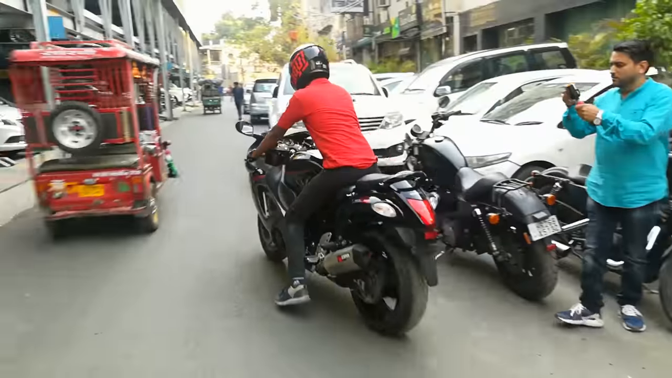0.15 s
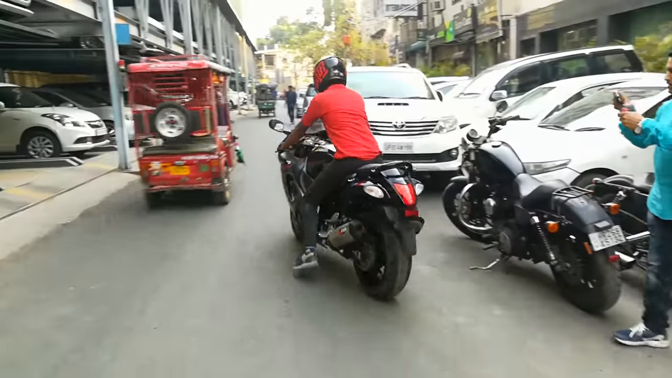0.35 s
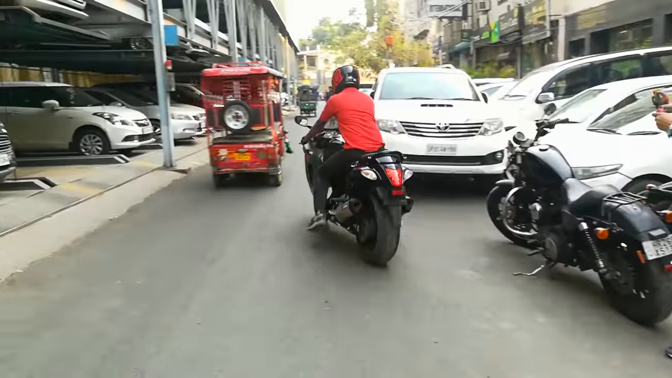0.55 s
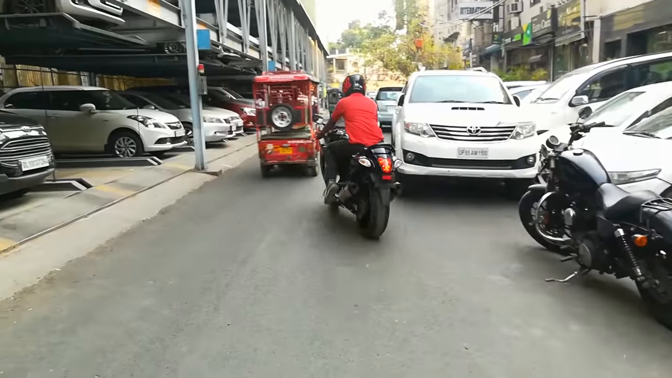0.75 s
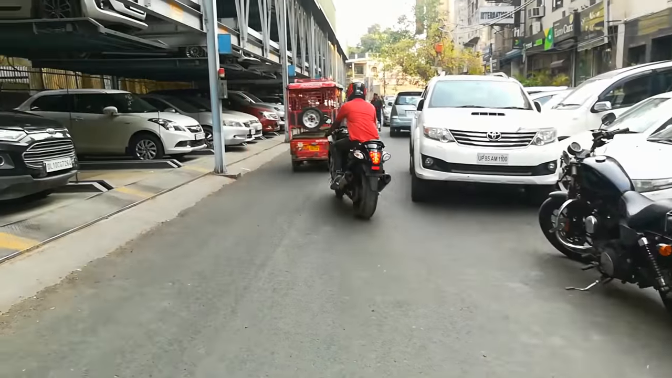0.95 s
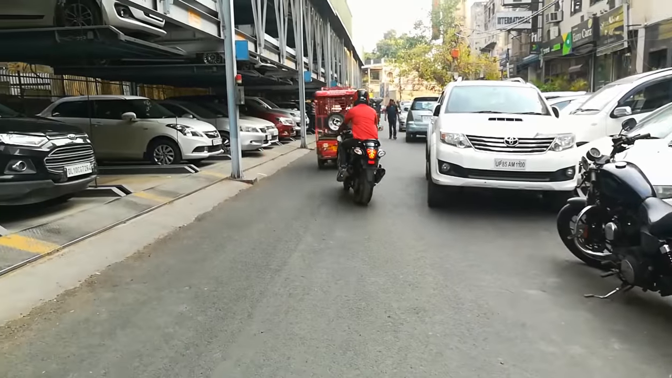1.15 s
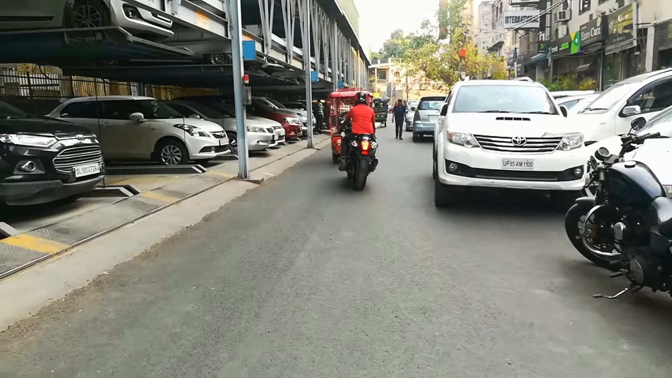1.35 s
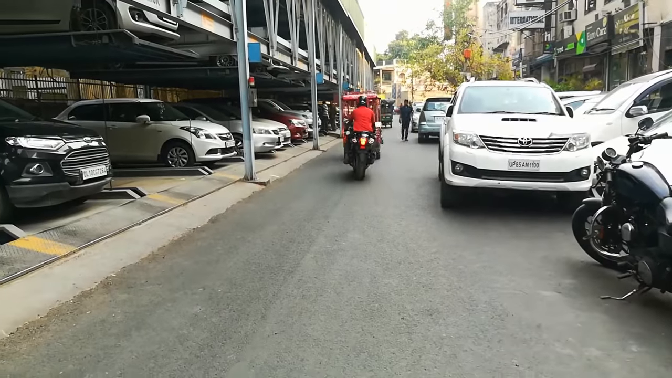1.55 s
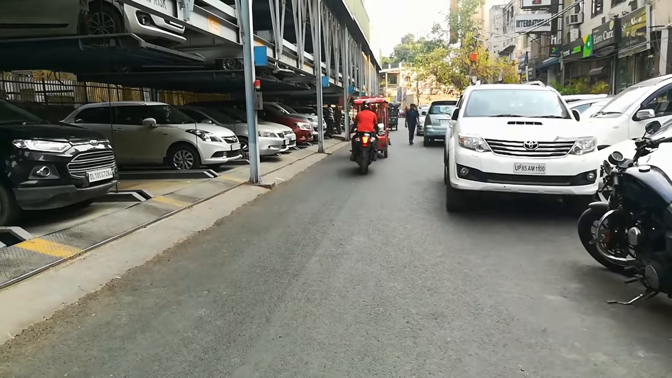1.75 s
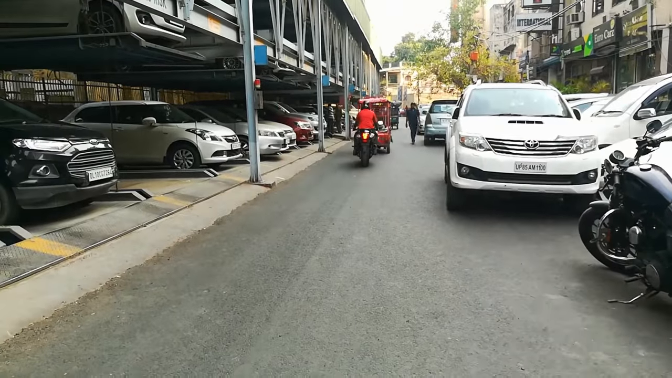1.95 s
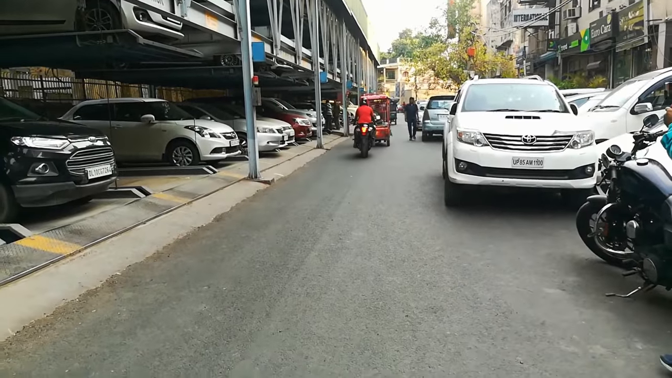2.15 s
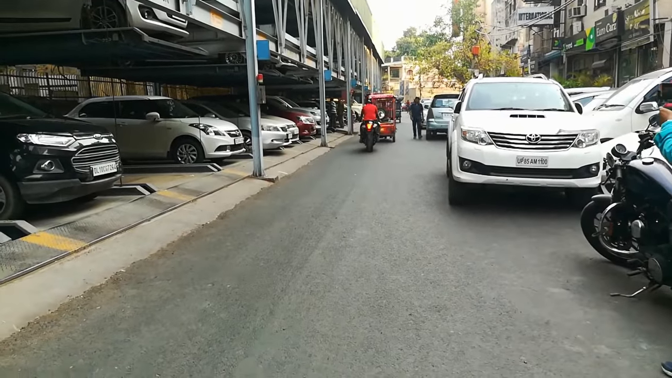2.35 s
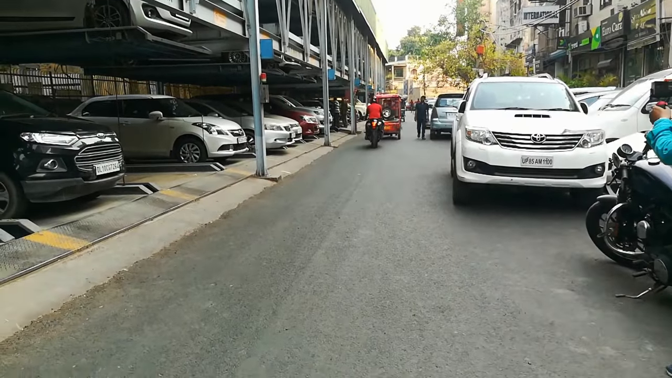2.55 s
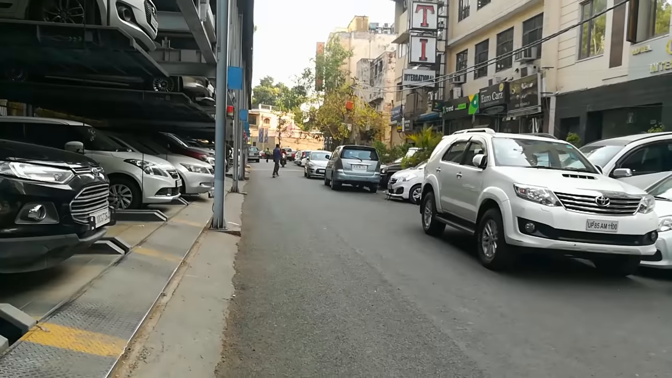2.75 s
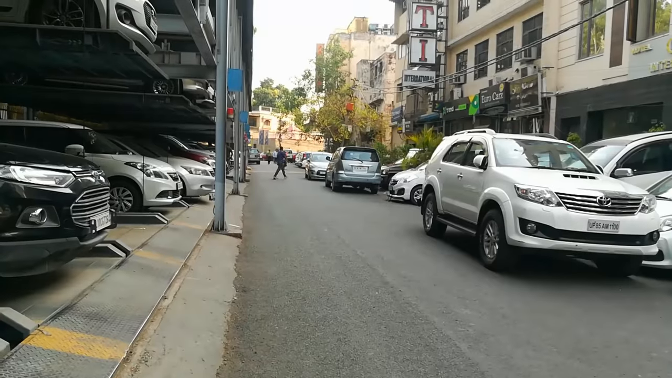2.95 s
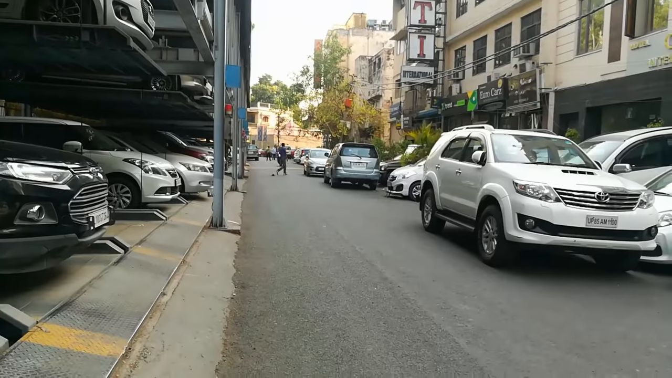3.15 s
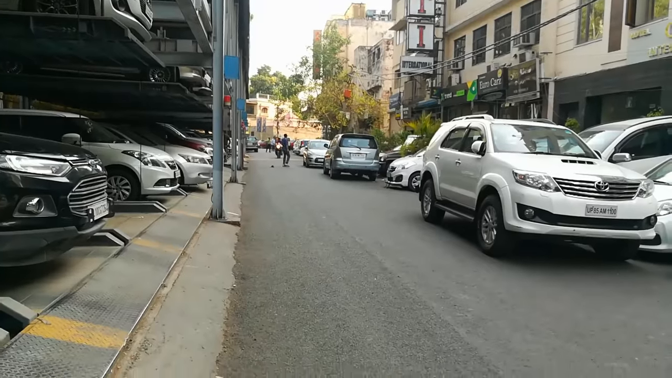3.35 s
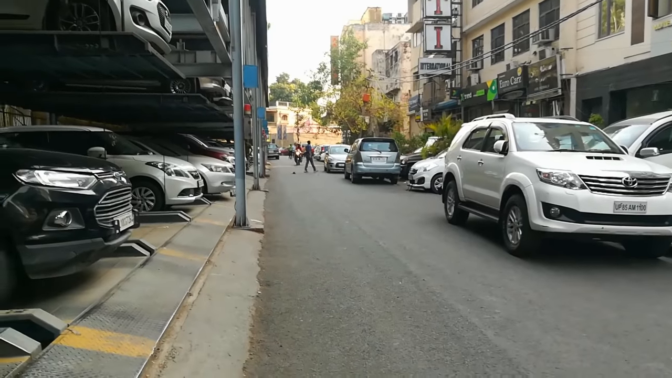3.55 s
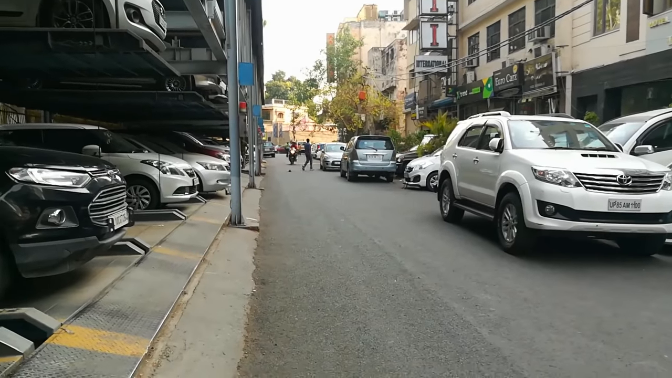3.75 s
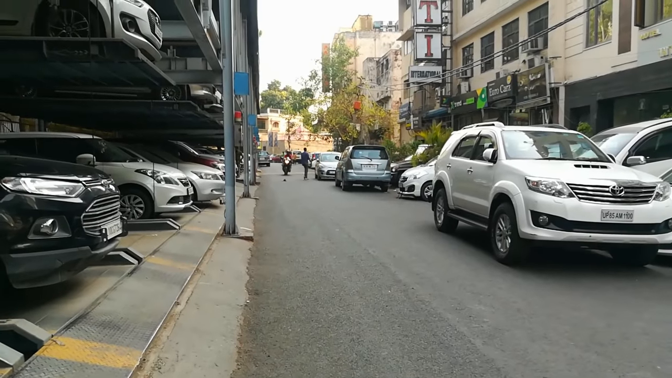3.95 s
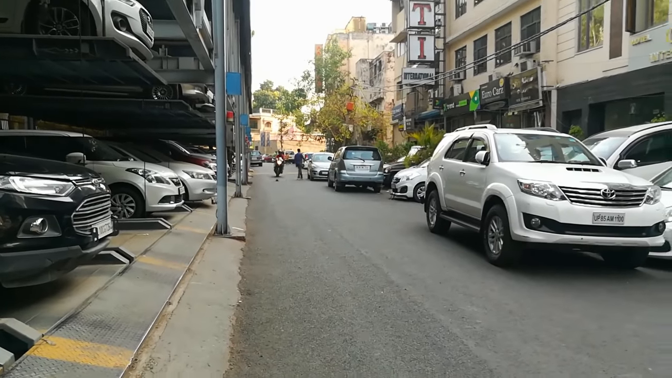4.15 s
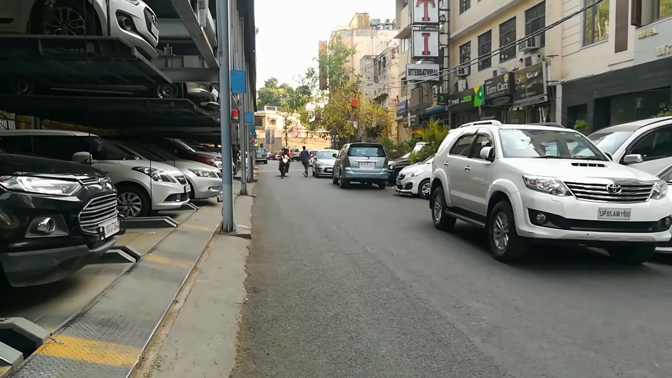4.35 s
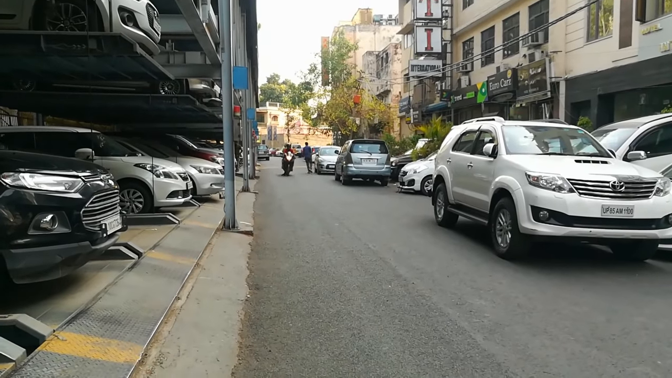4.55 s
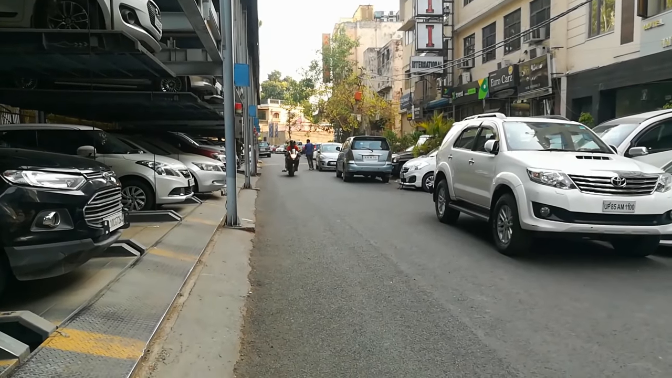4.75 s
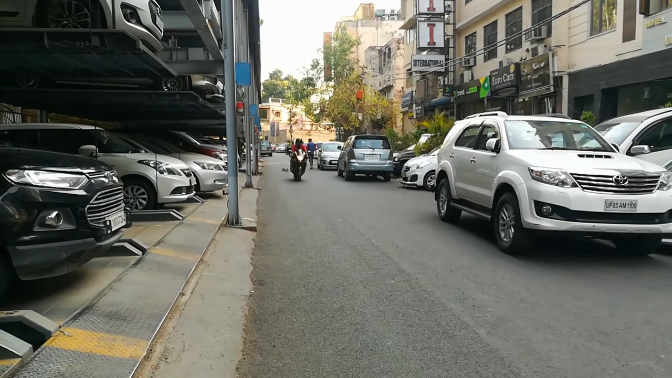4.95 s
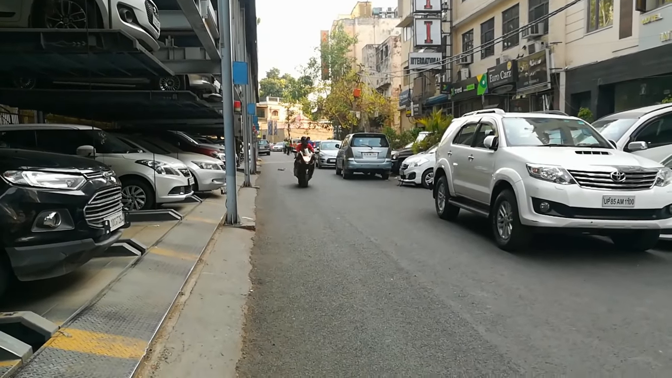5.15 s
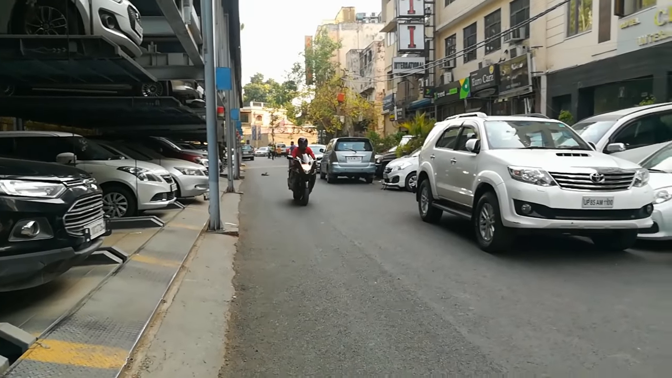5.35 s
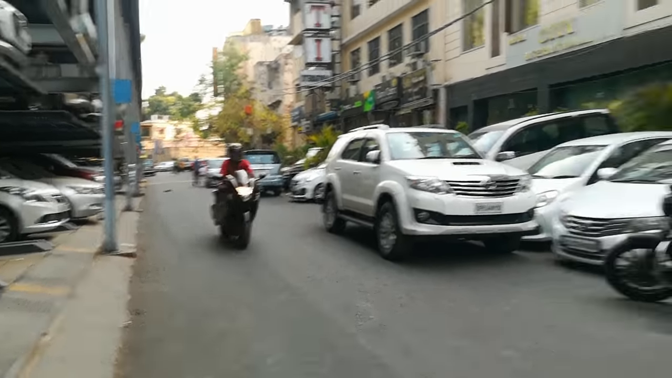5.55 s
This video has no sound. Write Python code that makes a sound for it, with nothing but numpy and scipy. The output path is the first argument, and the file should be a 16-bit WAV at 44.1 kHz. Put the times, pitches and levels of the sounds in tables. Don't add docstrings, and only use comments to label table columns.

```python
import sys
import numpy as np
from scipy import signal
from scipy.io import wavfile
from scipy.ndimage import uniform_filter1d

SR = 44100
rng = np.random.default_rng(int(sys.argv[2]) if len(sys.argv) > 2 else 0)


def nominal_scale(level):
    x = np.asarray(level, float) / 20
    return 10 ** x


def wav_out(sig):
    wavfile.write(sys.argv[1], SR, np.round(np.clip(np.atleast_2d(sig).T, -1, 1) * 32767).astype(np.int16))


N = 247842
T = np.arange(N) / SR
LEFT_RIGHT = np.array([[1], [-1]])
SHUT_S, LIFT_RAMP_S = 1.608, 0.054


def curves(table):
    s, *columns = np.transpose(table)
    gate = np.clip(np.minimum(T - s[0] + .002, s[-1] + .012 - T) / .004, 0, 1)
    return [np.interp(T, s, c) for c in columns] + [gate]


def unit(x):
    return x / np.sqrt(np.mean(x ** 2))


def noise():
    return rng.standard_normal(N)


def walk(rate):
    k = int(SR / rate)
    held = np.repeat(rng.standard_normal(N // k + 1), k)
    return unit(uniform_filter1d(uniform_filter1d(held, k), k)[:N])


def swell(s, width_s):
    return np.exp(-((T - s) / width_s) ** 2)


def ring(x, hz, width):
    return signal.lfilter(*signal.iirpeak(hz, hz / width, fs=SR), x)


def ring_twice(x, hz, width):
    return ring(ring(x, hz, width), hz, width)


def on_log(hz, table):
    table_hz, values = np.transpose(table)
    return np.interp(np.log(hz), np.log(table_hz), values)


def nulls(table):
    return sum(20 * np.log10(1 - (1 - nominal_scale(-abs(db))) * swell(s, width)) for s, db, width in table)


def traffic():
    passing = nominal_scale(-36) * swell(3.84, 0.43) * unit(ring_twice(noise(), 65.5, 50.))
    return passing + nominal_scale(-49 + 1.1 * walk(5.17)) * unit(ring(noise(), 32, 26.0))


def street(x):
    t60_s, echo_db, bass_hz = .3, -4, 410
    t = T[:SR // 2]
    tail = rng.standard_normal(len(t)) * np.exp(-np.log(1000) * t / t60_s)
    wet = signal.fftconvolve(x, tail / np.linalg.norm(tail))[:N] * walk(8.9)
    side = signal.sosfilt(signal.butter(3, bass_hz, "high", fs=SR, output="sos"), wet)
    return x + (nominal_scale(echo_db) * side + nominal_scale(-24) * wet) * LEFT_RIGHT


# (frequency [Hz], level per Hz [dB])
HISS_BEHIND = [(330, 20), (560, -12.5), (792, -3), (923, -5.5), (1340, -6.5), (1750, -5), (2250, -12),
               (3410, -11), (3860, -17), (4960, -14), (15500, -28.5)]
# (frequency [Hz], level per Hz [dB])
HISS_FRONT = [(330, 1), (560, 0.5), (1140, -2.5), (1310, -3.5), (1570, -5), (1850, -4), (2580, -10),
              (3650, -9.5), (6280, -18.5), (10600, -24.5), (15500, -32.5)]
# (frequency [Hz], likeness [0-1])
LIKENESS = [(400, 0), (600, 0), (1000, 0.13), (2000, 0.16), (4000, 0)]
# (frequency [Hz], left minus right [dB])
TILT = [(60, 0.0), (110, 0.0), (200, 0.0), (380, 1.5), (700, -0.5), (1290, 0.5), (2380, 1), (4400, 2),
        (8120, -7.5), (15000, -15)]


def hiss(near_db, returning):
    out, shared = 0, walk(18)
    for hz in 500 * 2 ** np.arange(0, 5, 1 / 3):
        mid, side = (ring_twice(noise(), hz, hz / 3) for _ in range(2))
        like = np.clip(on_log(hz, LIKENESS), 0, 1)
        pair = np.sqrt(1 + like) * mid + np.sqrt(1 - like) * side * LEFT_RIGHT
        front_db = on_log(hz, HISS_FRONT) + 0.084 * near_db * np.log2(hz / 2000)
        db = np.where(returning, front_db, on_log(hz, HISS_BEHIND))
        db = db + .3 * shared + .9 * walk(14)
        out = out + nominal_scale(db) * nominal_scale(on_log(hz, TILT) / 2 * LEFT_RIGHT) * pair
    return unit(out)


# (time [s], length [s], centre [Hz], level [dB])
RUSTLES = [
    (3.26, 0.0027, 9010, -52),
    (3.264, .002, 14000, -52),
    (3.312, 0.0011, 8000, -43),
    (3.328, 0.058, 14500, -57),
    (3.33, 0.023, 8040, -61),
]


def rustle():
    grit, scrape = noise(), 0
    for s, length, hz, db in RUSTLES:
        shape = np.exp(-((T - s) / (length / 2)) ** 4)
        scrape = scrape + nominal_scale(db) * shape * unit(ring(grit, hz, 0.55 * hz))
    return scrape * np.array([[.3], [1.7]])


def rings(table):
    return sum(nominal_scale(db + walk(12)) * unit(ring(noise(), hz, width)) for hz, width, db in table)


# (frequency [Hz], width [Hz], level re hiss [dB])
STREET_RINGS = [(910, 61, -17), (1259, 16, -21.5), (2220, 50, -20.5), (3420, 130, -26), (4900, 250, -38)]
# (frequency [Hz], width [Hz], level re hiss [dB])
STREET_ROAR = [(890, 110, -17.5), (1360, 174, -9.5)]
# (frequency [Hz], width [Hz], level re hiss [dB])
FAIRING = [(1450, 80, -12), (1760, 170, -8), (2255, 45, -20)]
# (time [s], share [0-1])
FACING = [
    (4.2, 0),
    (4.38, 1),
    (4.95, 1),
    (5.15, 0),
]


def panels(returning):
    near = curves(FACING)[0]
    far = returning * (T < FACING[1][0]) * (1 - near)
    return near * rings(FAIRING) + ~returning * rings(STREET_RINGS) + far * rings(STREET_ROAR)


# (time [s], width [s], level re rush [dB])
PANEL_SWELLS = [
    (4.82, .15, -14),
    (5.27, .14, -9.5),
]


def whine(hz, pulling, returning, lift):
    teeth, blur = 26, .00032
    turns = np.cumsum(hz) / SR
    over_hz = hz - 117
    back_db = -14 + np.minimum(.5 * over_hz, -.05 * over_hz) - 9 * lift
    gear = pulling * nominal_scale(np.maximum(-5.5 - 17 * T, -15)) + returning * nominal_scale(back_db)
    mesh = 2 * np.pi * teeth * turns + blur * hz * teeth * walk(110)
    pulsed = 1 + .8 * np.sin(2 * np.pi * turns)
    gears = gear * nominal_scale(3 * walk(30)) * pulsed * np.sin(mesh)
    octave = pulling * np.clip((hz - 60) / 4, 0, 1) * nominal_scale(-14 - 6 * T + 1.5 * walk(25))
    tank = sum(nominal_scale(db) * swell(s, width) for s, width, db in PANEL_SWELLS)
    return gears + octave * np.sin(2 * mesh) + tank * unit(ring(noise(), 3041, 34.0))


# (time [s], peak level [dB])
POPS = [(1.734, -28), (1.769, -30), (1.868, -25), (1.951, -35), (2.04, -34), (2.074, -28.5), (2.146, -53),
        (2.334, -57), (2.366, -32.5), (2.519, -36)]


def afterfire():
    kicks = np.zeros(N)
    for s, db in POPS:
        kicks[int(s * SR)] = nominal_scale(db)
    thud = np.eye(1, 2048)[0]
    for hz, width in ((290.0, 220.), (280., 180.0), (275.0, 120.0)):
        thud = ring(thud, hz, width)
    return nominal_scale(-6.5) * np.convolve(kicks, thud / thud.max())[:N]


def burble(hz, pipe, scatter_db, jitter, smear_s, upper_db=0.):
    at = np.flatnonzero(np.diff(np.floor(np.cumsum(hz) / SR)))
    timing, strength = rng.standard_normal((len(at), 2)).T
    pulses = np.zeros(N)
    late = np.clip(at + jitter * timing * SR / hz[at], 0, N - 1).astype(int)
    np.add.at(pulses, late, nominal_scale(scatter_db * strength))
    t = T[:SR // 4]
    echoes = rng.standard_normal(len(t)) * np.exp(-t / smear_s)
    pulses = unit(pulses + 0.88 * signal.fftconvolve(pulses, echoes / np.linalg.norm(echoes))[:N])
    modes = [(-1) ** k * nominal_scale(db) * unit(ring_twice(pulses, f, 1.87 * width))
             for k, (f, width, db) in enumerate(pipe)]
    return (sum(modes[:2]) + nominal_scale(upper_db) * sum(modes[2:])) / np.std(sum(modes))


# (frequency [Hz], width [Hz], level [dB])
PIPE = [(65.5, 126, -6), (131, 54, 3), (194, 86, 1), (338, 145, -6), (492, 28, -18.5)]


def rumble(hz, gain):
    return burble(hz, PIPE, scatter_db=3., jitter=.4, smear_s=.04) * gain


# (frequency [Hz], width [Hz], level [dB])
PIPE_SHUT = [(71.7, 13.9, -5), (97, 27.4, -5), (135.5, 19.3, -6), (195.3, 14.2, -10), (306, 59, -20.5)]
# (time [s], depth [dB], width [s])
STUMBLES = [
    (1.6, 1, 0.026),
    (1.89, -4.5, 0.038),
    (2.06, -1.5, 0.021),
    (2.27, 1, 0.13),
]


def coast(hz):
    fade_db = -26.5 - 9 * (T - SHUT_S) + nulls(STUMBLES)
    return burble(hz, PIPE_SHUT, scatter_db=3.0, jitter=0.203, smear_s=0.021, upper_db=0.5) * nominal_scale(fade_db)


# (time [s], length [s], share of the rush lost [0-1])
LIFTS = [
    (4.905, 0.15, 0.35),
    (5.446, .3, 0.99),
]


def lifted():
    lift = lost = 0
    for s, length, share in LIFTS:
        gate = np.clip(np.minimum(T - s, s + length - T) / LIFT_RAMP_S + .5, 0, 1)
        lift, lost = lift + gate, lost + share * gate
    return lift, lost


# (time [s], half order re 2nd order [dB])
HALF_ORDER_RISE = [(0, -28), (1.6, -21), (2.56, -2), (4, -18), (4.4, -10.5), (4.85, -4), (5.1, -11.5), (5.62, 2)]
# (order, level [dB])
HALVES = [(.5, -49), (1.5, 0.5), (2.5, -18), (3.5, -19.5)]


def exhaust(hz, first_db, second_db, third_db, upper, flicker_db, slip):
    muffler_hz, muffler_db_oct = 420, -18
    turns, half_rise_db = np.cumsum(hz) / SR, curves(HALF_ORDER_RISE)[0]
    lines = [(1, first_db), (2, second_db), (3, third_db)]
    for k, db in upper:
        lines.append((k, third_db + db + muffler_db_oct * np.log2(np.maximum(k * hz / muffler_hz, 1))))
    lines += [(k, second_db + half_rise_db + db) for k, db in HALVES]
    out = 0
    for k, db in lines:
        rough = np.minimum(k * hz / muffler_hz, 1.15) ** 5
        shake = walk(30)
        angle = 2 * np.pi * k * turns + slip * k * walk(9) + .45 * rough * shake[::-1]
        angle = angle + 1.7 * (k == 1)
        out = out + np.sqrt(2) * nominal_scale(db + flicker_db * np.sqrt(k) * shake) * np.sin(angle)
    return out


# (time [s], depth [dB], width [s])
NULLS_FIRST = [(.9, 0, 0.062), (1.28, -6, .05), (2.616, -9, 0.044), (2.786, -6, .06), (3.03, -10, 0.096),
               (3.16, -6.5, 0.051), (3.445, -20, 0.067), (3.5, -4, .03), (3.568, -31, 0.037),
               (3.73, -23, 0.067), (3.97, -8.5, 0.038), (4.04, -32, 0.048), (4.11, -34, 0.048),
               (4.336, -16, 0.037), (4.422, -16, 0.042), (4.55, -10.5, .05), (4.613, -14.5, 0.02),
               (5.14, -5, 0.012), (5.26, -4, 0.035), (4.886, -16, 0.032), (5.088, -3, 0.034),
               (5.34, -13, 0.043), (5.485, -12, 0.018), (5.545, -8.5, 0.047)]
# (time [s], depth [dB], width [s])
NULLS_SECOND = [(.06, -6, 0.091), (.89, -8.5, 0.037), (1.356, -14, .06), (2.787, -2.5, 0.035),
                (3.051, 0, 0.023), (3.276, -23, 0.057), (3.643, -6, 0.093), (3.767, -28, 0.071),
                (4.167, -17, 0.04), (4.27, -3, 0.074), (4.575, -9.5, 0.035), (4.65, -20, 0.017),
                (4.817, -16, 0.029), (5.11, -7, 0.035), (5.26, 1.5, 0.019)]
# (time [s], depth [dB], width [s])
NULLS_THIRD = [(0.057, -5, 0.072), (.23, -3.5, 0.099), (.33, -1.5, 0.066), (.911, 0, 0.033),
               (2.94, 0, 0.062), (3.411, 2, 0.025), (3.6, -3.5, 0.13), (3.858, -18, 0.038),
               (4.172, -17, 0.018), (4.43, -11, 0.082), (4.62, -12, 0.023)]


def echo_dips():
    return [nulls(table) for table in (NULLS_FIRST, NULLS_SECOND, NULLS_THIRD)]


# (level [dB], fade [dB per s squared])
ORDERS_AWAY = [(-21.5, -6), (-21.5, -3), (-30, -1.5)]
# (order, level re 3rd order [dB])
UPPER_AWAY = [(4, -5), (5, -12), (6, -19), (7, -28), (8, -31)]


def leaving(hz):
    levels = [db + fade_db * T ** 2 + dip for (db, fade_db), dip in zip(ORDERS_AWAY, echo_dips())]
    return exhaust(hz, *levels, UPPER_AWAY, flicker_db=.5, slip=.07)


# (level [dB], rise [dB per s], muffler slope above cut-off [dB per octave])
ORDERS_BACK = [(-27, 6.5, -1), (-37.5, 5.5, 2), (-41, 2, -5)]
# (order, level re 3rd order [dB])
UPPER_BACK = [(4, -7), (5, -13.5), (6, -47)]


def coming(hz, since, lift):
    levels = []
    for k, ((db, rise_db, cut_db), dip) in enumerate(zip(ORDERS_BACK, echo_dips())):
        order_hz = (k + 1) * hz
        muffled = cut_db * np.log2(np.maximum(order_hz / 317, 1))
        can = 4.5 * np.exp(-(np.log2(order_hz / 322) / .13) ** 2)
        levels.append(db + rise_db * since + muffled + can + dip - 21 * (k > 0) * lift)
    return exhaust(hz, *levels, UPPER_BACK, flicker_db=1.0, slip=.12)


# (time [s], firing rate [Hz], rush level [dB])
AWAY = [(0.0, 73.1, -44), (.39, 58.74, -45), (0.601, 65.9, -44.5), (.92, 61.9, -45.5), (1.5, 74.7, -48.5),
        (1.621, 72.2, -51), (1.66, 66.3, -51), (2.545, 65.95, -56)]
# (time [s], firing rate [Hz], rush level at open throttle [dB])
BACK = [(2.557, 64.16, -46), (3.401, 92.24, -45.5), (3.9, 117.8, -44), (4.4, 156.1, -38),
        (4.68, 181.7, -34.5), (4.884, 214.8, -30.5), (5.081, 154.1, -32.5), (5.19, 152.4, -32),
        (5.43, 167.3, -25), (5.55, 148.4, -27.5)]


def scene():
    *away, on_away = curves(AWAY)
    *back, on_back = curves(BACK + [(T[-1], *BACK[-1][1:])])
    back_s, _, back_db = BACK[0]
    returning = T >= back_s
    pulling = np.clip((SHUT_S - T) / (2 * LIFT_RAMP_S) + .5, 0, 1)
    lift, lost = lifted()
    hz = np.where(returning, back[0], uniform_filter1d(away[0], int(0.081 * SR)))
    rush_db = np.where(returning, back[1] - 7 * lost, away[1])
    engine = pulling * leaving(hz) + on_back * coming(hz, T - back_s, lift)
    engine = engine + (lift - lost) * nominal_scale(-24.5 + 2.3 * walk(20)) * np.sin(np.pi * np.cumsum(hz) / SR)
    rumble_db = -34 + 0.65 * (rush_db - back_db) + 6 * (lift - lost)
    engine = engine + rumble(hz, pulling * nominal_scale(rush_db + 11) + on_back * nominal_scale(rumble_db))
    engine = engine + on_away * (1 - pulling) * coast(hz)
    tones = whine(hz, pulling, returning, lift) + panels(returning)
    treble = hiss(rush_db + 34, returning) + np.array([np.roll(tones, 2), tones])
    return street(engine + afterfire() + traffic()) + nominal_scale(rush_db + 2.0) * treble + rustle()


def top_cut(x):
    return signal.sosfilt(signal.butter(12, 15630, fs=SR, output="sos"), x)


def record(dry):
    rounded = np.tanh(0.59 * dry) / 0.6
    top = signal.sosfilt(signal.ellip(8, .2, 70, 15500, fs=SR, output="sos"), rounded)
    ending = np.clip((T[-1] - T) / .003, 0, 1)
    return top_cut(top * ending)


dry = scene()
out = record(dry)
wav_out(out)
```